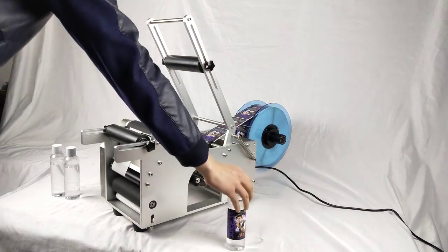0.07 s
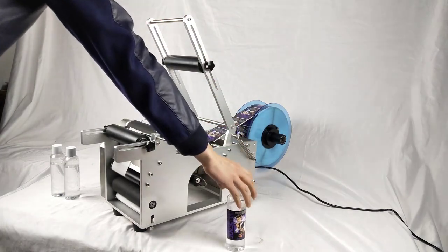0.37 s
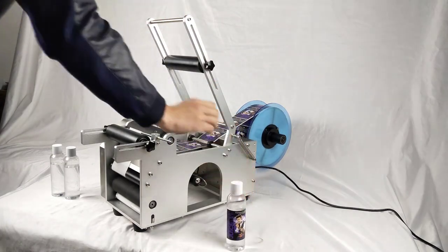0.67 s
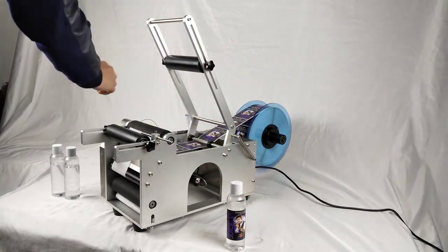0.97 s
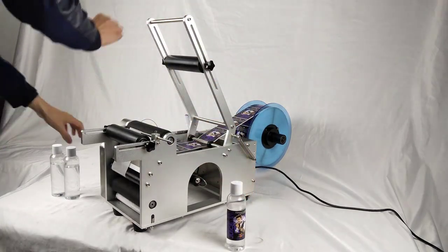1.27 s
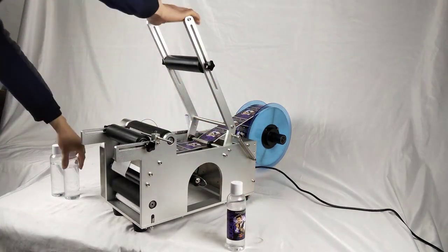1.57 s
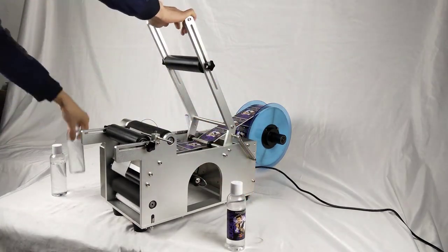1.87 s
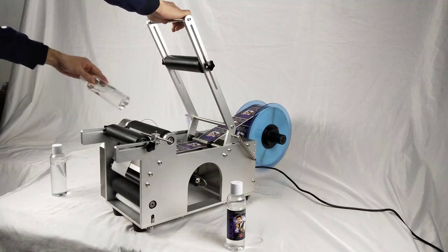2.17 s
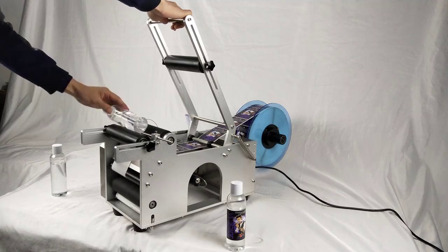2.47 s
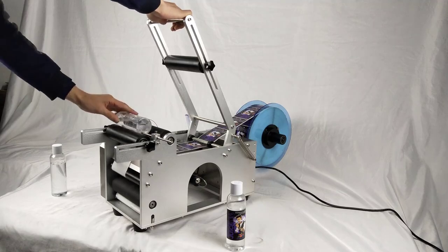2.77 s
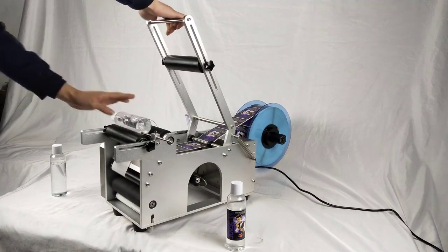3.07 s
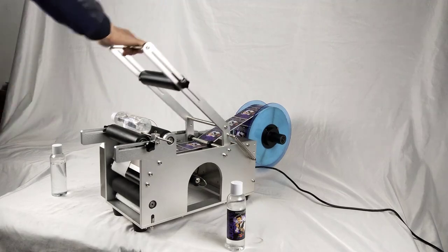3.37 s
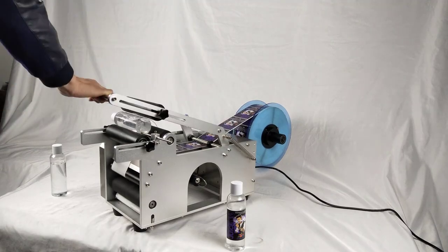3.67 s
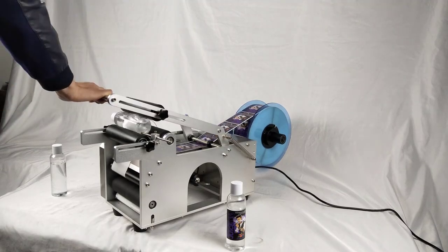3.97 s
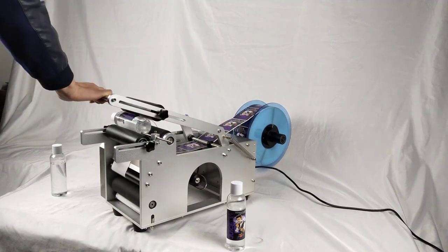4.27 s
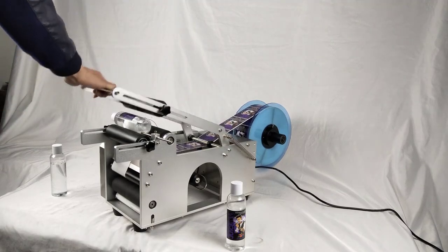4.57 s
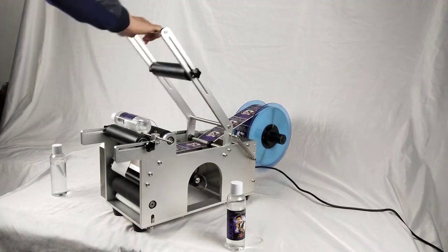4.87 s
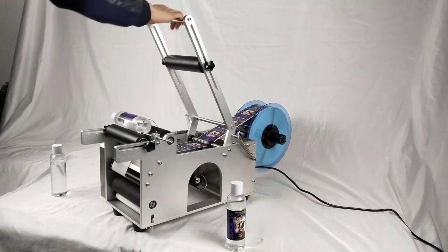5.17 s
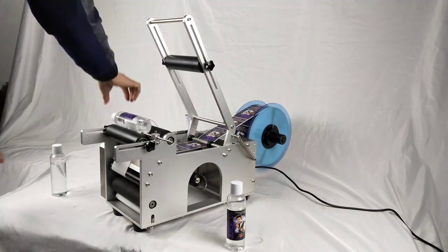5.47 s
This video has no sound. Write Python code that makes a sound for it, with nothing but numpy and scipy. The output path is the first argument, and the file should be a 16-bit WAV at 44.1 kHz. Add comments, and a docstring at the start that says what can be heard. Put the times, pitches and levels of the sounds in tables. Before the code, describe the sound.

A soft, low thud of a bottle on a padded table is followed by quiet swishes of a sleeve. Then a plastic bottle lands on the rollers of a small labeling machine with a sharp clack and a few lighter taps. A metal lever closes with a clunk, starting a brief whining, rattling motor run as a sticky label peels off. A crisp click ends it. Heard in mono from nearby, with short small-room echoes.

```python
"""Hand-fed bottle labeler

In a small room a labeled bottle thuds onto a cloth-covered table and a jacket sleeve rustles.
The next plastic bottle clacks onto the rollers, ringing the steel frame. The lever comes down,
a geared motor whirs for half a second while a label peels off, and the switch clicks free."""
import sys
import numpy as np
from scipy import signal
from scipy.fft import rfft, irfft
from scipy.io import wavfile

SR = 44100
rng = np.random.default_rng(int(sys.argv[2]) if len(sys.argv) > 2 else 0)


def transcribe(signal):
    """Save signal, clipped to [-1, 1], as a 16-bit WAV file at the path in sys.argv[1]."""
    frames = np.atleast_2d(signal).T
    limited = np.clip(frames, -1, 1)
    pcm = np.round(limited * 32767).astype(np.int16)
    wavfile.write(sys.argv[1], SR, pcm)


N = 247401
T = np.arange(N) / SR
SHOT_T, SHOT_HZ = T[:SR], np.fft.rfftfreq(SR, 1 / SR)  # axes of a one-second one-shot


def amp(db):
    return 10 ** (np.asarray(db) / 20)


def unit(x):
    return x / np.sqrt(np.mean(x ** 2) + 1e-20)


def curve(points, hz):
    """Breakpoints joined by lines on a log-frequency axis."""
    f, value = np.transpose(points)
    return np.interp(np.log(hz + 1), np.log(f + 1), value)


def eq_gain(points, resonances, hz):
    """Gain of an EQ curve with bell-shaped resonances on top."""
    bells_db = sum(db / (1 + (2 * (hz - f) / width) ** 2) for f, width, db in resonances)
    return amp(curve(points, hz) + bells_db)


def colour(x, points, resonances=()):
    """Equalises x and brings it to rms 1."""
    hz = np.fft.rfftfreq(len(x), 1 / SR)
    return unit(irfft(rfft(x) * eq_gain(points, resonances, hz), len(x)))


def waver(hz):
    """Random modulation of rms 1, up to about hz."""
    lowpass = np.exp(-(np.fft.rfftfreq(N, 1 / SR) / hz) ** 2)
    return unit(irfft(rfft(rng.standard_normal(N)) * lowpass, N))


def ramp(start, length):
    return np.clip((T - start) / length, 0, 1)


def swell(peak, width):
    return np.exp(-((T - peak) / width) ** 2)


def add(mix, start, sound):
    part = mix[max(round(start * SR), 0):][:len(sound)]
    part += sound[:len(part)]


def ring(modes):
    """One second of damped modes struck together, in alternating polarity."""
    return sum((-1) ** k * amp(db - 60 * SHOT_T / t60) * np.sin(2 * np.pi * hz * SHOT_T)
               for k, (hz, db, t60) in enumerate(modes))


# reverb time of the small room: f/Hz, t60/s
ROOM_DECAY = [(100, 0.54), (400, 0.78), (1000, 0.49), (3000, 0.46), (6500, 0.35), (10000, 0.34),
              (16000, 0.28)]


def reflections(predelay_s=0.0029):
    """Dense room echoes of energy 1, each band dying at its own speed."""
    hz, t, bands = signal.stft(rng.standard_normal(SR), SR, nperseg=256)
    decay = amp(-60 * t / curve(ROOM_DECAY, hz)[:, None])
    tail = signal.istft(bands * decay, SR, nperseg=256)[1][:SR]
    tail *= np.clip(SHOT_T / predelay_s - 1, 0, 1)
    return tail / np.linalg.norm(tail)


# EQ of the room tone: f/Hz, level/dB
AIR_EQ = [(15, -47), (25, -17), (61, 7), (93, -5), (193, -6.5), (274, -4), (368, -13.5), (871, -12),
          (1110, -16), (2850, -24), (5280, -20.5), (5730, -29.5), (7100, -28.5), (8810, -38),
          (15500, -37.5)]


def room_tone(level_db=-67.5):
    """A steady bed of low rumble and faint hiss."""
    return amp(level_db) * colour(rng.standard_normal(N), AIR_EQ)


# EQ of the fabric's dull flap and of its bright swish: f/Hz, level/dB
FLAP_EQ = [(25, -3), (50, 7.5), (85, 13.5), (150, 2.5), (260, 0.5), (450, -2), (1000, -5), (2000, -15),
           (3500, -23), (8000, -41)]
SWISH_EQ = [(500, -11), (1300, -0.5), (2500, 1), (3500, -2.5), (5000, -0.5), (7000, -4), (9000, -19.5),
            (12000, -20), (15300, -16)]
# fader ride of the cloth stirring between strokes: t/s, relative level/dB
CLOTH_STIR = [(0, -64.5), (1.0, -70), (1.7, -73), (2.25, -80.5), (3.1, -78), (4.8, -71), (5.6, -73.5)]
# arms reaching, lifting and pulling back: t/s, length/s, relative level/dB, swish offset/dB
SLEEVE_STROKES = [(0.005, 0.26, -60, -10), (0.343, 0.055, -65.5, -14), (0.437, 0.022, -62, -11),
                  (0.533, 0.2, -62.5, -7.5), (0.795, 0.08, -61, -10.5), (1.057, 0.45, -63, -6),
                  (1.205, 0.26, -68, 2.5), (1.552, 0.052, -65.5, -3.5), (1.749, 0.022, -68.5, -7),
                  (2.014, 0.042, -66, -4.5), (2.082, 0.022, -66, -7), (2.492, 0.458, -66, -8),
                  (3.026, 0.02, -63.5, -7), (3.179, 0.031, -65, -7), (3.246, 0.046, -65, -5),
                  (3.32, 0.033, -64.5, -4.5), (3.383, 0.059, -64.5, -5), (3.557, 0.045, -63.5, -7),
                  (3.626, 0.095, -67.5, -4.5), (4.419, 0.076, -63.5, -3), (4.541, 0.068, -71.5, 1.5),
                  (4.68, 0.037, -65.5, -11), (4.882, 0.18, -72.5, -2.5), (5.114, 0.16, -61.5, -10.5),
                  (5.37, 0.076, -70, -13), (5.515, 0.077, -70, -2.5)]


def sleeve(flap_db=4, swish_db=2, grain_db=2, stir_waver_db=2.5, stir_swish_db=-8,
           rise_s=0.024, fall_s=0.022, arch_db=0.5):
    """Fabric slides over itself: a flap and a swish of fine slips follow the speed of the arm."""
    flap = colour(rng.standard_normal(N), FLAP_EQ)
    swish = colour(rng.standard_normal(N) * amp(grain_db * waver(hz=490)), SWISH_EQ)
    stir = amp(np.interp(T, *np.transpose(CLOTH_STIR)) + stir_waver_db * waver(hz=9))
    flap_power = stir ** 2
    swish_power = (stir * amp(stir_swish_db)) ** 2
    for start, length, db, treble_db in SLEEVE_STROKES:
        arch = np.sin(np.pi * ramp(start, length + fall_s)) - 0.5  # fastest midway
        release = np.exp(-np.maximum(T - start - length, 0) / fall_s)
        speed = amp(db + arch_db * arch) * ramp(start, rise_s) * release
        flap_power += speed ** 2
        swish_power += (speed * amp(treble_db)) ** 2
    return amp(flap_db) * np.sqrt(flap_power) * flap + amp(swish_db) * np.sqrt(swish_power) * swish


# soft touches of hand, cuff and bottle base: t/s, level/dB, EQ at 4 kHz/dB, t60/s
SOFT_TOUCHES = [(0.0122, -48, -14, 0.12), (0.022, -45, -17, 0.13), (0.807, -58, -15, 0.12),
                (5.139, -56.5, -31, 0.11), (5.232, -53.5, -22, 0.11)]


def bumps():
    """Padded contacts ring nothing: each is a dull puff."""
    out = np.zeros(N)
    for start, db, bright_db, t60 in SOFT_TOUCHES:
        puff_eq = [(40, -9), (120, -2), (500, 5.5), (1300, -9), (4000, bright_db), (10000, -37)]
        puff = colour(rng.standard_normal(SR), puff_eq)
        add(out, start, puff * amp(db - 60 * SHOT_T / t60))
    return out


# bottle base meeting the padded table: t/s, level/dB, f/Hz, t60/s
TABLE_THUDS = [(0.0193, -31, 281, 0.055), (0.0244, -31.5, 150.2, 0.15), (0.041, -27, 160, 0.039),
               (0.052, -30, 89, 0.14)]


def table_thuds(attack_s=0.00082):
    """The cloth leaves only a few low, quickly damped swings of the table top."""
    out = np.zeros(N)
    attack = 1 - np.exp(-SHOT_T / attack_s)
    for start, db, hz, t60 in TABLE_THUDS:
        add(out, start, ring([(hz, db, t60)]) * attack)
    return out


# EQ of a bright tick: f/Hz, level/dB
TICK_EQ = [(1500, -11.5), (3200, -6.5), (4800, -8), (6000, -3), (7200, -5), (10500, -16), (13000, -16),
           (14300, -13), (15300, -3)]
# switch and small parts: t/s, level/dB, ring f/Hz, ring width/Hz, ring t60/s, tick offset/dB
PART_CLICKS = [(2.2352, -56, 4100, 1100, 0.033, -18), (4.615, -54, 6630, 501, 0.06, 10),
               (4.650, -45.5, 5000, 380, 0.06, -24), (4.898, -74, 5100, 220, 0.23, -10),
               (4.968, -70.5, 5000, 220, 0.13, -10), (5.04, -69, 5000, 220, .15, -12)]


def clicks(tick_t60=0.13):
    """Small parts tick and leave a cluster of close modes ringing."""
    out = np.zeros(N)
    for start, db, ring_hz, width, t60, tick_db in PART_CLICKS:
        band = 1 / (1 + (2 * (SHOT_HZ - ring_hz) / width) ** 4)
        cluster = unit(irfft(rfft(rng.standard_normal(SR)) * band, SR)) * amp(-60 * SHOT_T / t60)
        tick = colour(rng.standard_normal(SR), TICK_EQ) * amp(tick_db - 60 * SHOT_T / tick_t60)
        add(out, start, amp(db) * (cluster + tick))
    return out


# modes that ring with each hit, those of the steel frame and rollers plus the long bottle rings near 1.7 and
# 3.4 kHz: f/Hz, relative level/dB, t60/s
FRAME_MODES = [(86.3, -8.5, 0.54), (149.8, -12, 0.79), (163, -14, 0.7), (297.6, -11, 0.76), (350, -10.5, 1),
               (402.4, -16.5, 1), (440, -15, 0.2), (562, -14, 0.99), (561, -9, 0.39), (700, -30, 0.4),
               (798, -20, 0.8), (959, -9.5, 0.18), (1108, -10, 0.14), (1066, -11, 0.16), (1390, -15, 0.17),
               (1516, -9, 0.23), (1705, -11.5, 0.42), (2165, -12, 0.15), (3090, -28, 0.19),
               (3400, -9.5, 0.42), (4300, -17, 0.15)]


def knocks(hits, eq, resonances, wet_db):
    """Each hit is a dense clatter, its echoes and the frame's ring, coloured by contact hardness."""
    out = np.zeros(N)
    body = unit(eq_gain(eq, resonances, SHOT_HZ))
    fade_out = np.minimum(2 - 2 * SHOT_T, 1) ** 2
    for start, db, bass_db, treble_db, fizz_db, t60, ring_db in hits:
        contact = [(300, bass_db), (1100, 0.0041), (5500, treble_db), (12000, fizz_db)]
        rattle = rng.standard_normal(SR) * amp(-60 * SHOT_T / t60)
        echoes = amp(wet_db) * np.linalg.norm(rattle) * reflections()
        clatter = irfft(rfft(rattle + echoes) * body * amp(curve(contact, SHOT_HZ)), SR)
        frame = ring([(f, level + curve(contact, f), decay) for f, level, decay in FRAME_MODES])
        add(out, start, amp(db) * (clatter + amp(ring_db) * frame) * fade_out)
    return out


# EQ of the bottle's clack: f/Hz, level/dB
BOTTLE_EQ = [(40, -22), (90, -3), (210, -6), (480, 1), (700, -5.5), (1030, 0.5), (1600, -3), (2000, -8),
             (2400, -7), (3000, -10), (5500, -10.5), (7000, -10), (9000, -22), (11500, -30.5), (16000, -32)]
# resonances of its shell against the rollers: f/Hz, width/Hz, gain/dB
SHELL_PEAKS = [(1110, 59, 4), (1370, 50, 3), (1510, 55, 3.5), (1692, 57, 8.5), (2330, 68, 4), (2870, 83, 6),
               (3400, 180, 9.5), (4260, 110, 6.5), (4760, 150, 8), (5140, 110, 5), (5270, 59, 6),
               (6130, 140, 7), (6880, 80, 7), (7730, 60, 6)]
# bottle hits: t/s, level/dB, bass/dB, treble/dB, fizz/dB, clatter t60/s, frame ring/dB
BOTTLE_HITS = [(2.4251, -34, -12, 4.5, 4, 0.079, -6.5), (2.4293, -24.5, -2.5, -3, -9, 0.041, -11),
               (2.4435, -44, 2, 7, -17, 0.15, -25), (2.477, -47, 11.5, 0, -5, 0.022, -7.5),
               (2.656, -48.5, 8.5, -2.5, -10, 0.1, -8), (2.670, -51, 12.5, 3, -4, .04, -6),
               (2.700, -53, 7, -1, 2, .025, -2), (2.7175, -41.5, 7, 0, -10, 0.063, -12.5),
               (3.044, -62, 12, -7, -9, 0.067, -31), (3.1765, -50.5, 3.5, 6, 2.5, 0.075, -26)]


def bottle():
    """The plastic bottle lands on the rollers and settles."""
    return knocks(BOTTLE_HITS, BOTTLE_EQ, SHELL_PEAKS, wet_db=-3)


# EQ of the lever's clunk: f/Hz, level/dB
LEVER_EQ = [(40, -5), (90, 0.5), (210, -9), (400, -6.5), (520, -2.5), (680, 3.5), (880, -2.5), (1160, 4.5),
            (1900, -4.5), (4600, -6), (7200, -6.5), (9500, -25), (16000, -27)]
# lever hits: t/s, level/dB, bass/dB, treble/dB, fizz/dB, clatter t60/s, frame ring/dB
LEVER_HITS = [(3.680, -61, 12, 2, -4, 0.13, -25), (3.7178, -33, -2, 6.5, 2.5, 0.044, -14.5),
              (3.7222, -31.5, 0, -11, 1, 0.061, -18.5), (3.746, -31.5, 4, -28, -14, 0.078, -20),
              (4.6495, -52, 6.5, 8.5, 1, 0.076, -12)]


def lever():
    """The pressure lever closes, presses home and lifts."""
    return knocks(LEVER_HITS, LEVER_EQ, [], wet_db=-2)


def running(start, rise, t60, motor_off_s=4.266):
    """Fades in, holds while the motor is on, then dies away."""
    return ramp(start, rise) * amp(-60 * np.maximum(T - motor_off_s, 0) / t60)


def tooth_pulse(shaft_hz=79, jitter=0.004, depth=0.13):
    """Meshing teeth make a fast tremolo in step with the shaft."""
    angle = 2 * np.pi * np.cumsum(shaft_hz * (1 + jitter * waver(hz=8.6))) / SR
    return 1 + depth * sum(np.cos(k * angle) for k in (1, 3, 6)) / 2


# resonances of gearbox and side plates, shared by peel and gears: f/Hz, width/Hz, gain/dB
HOUSING_PEAKS = [(460, 33, 5), (528, 35, 3), (1195, 50, 5), (1760, 56, -3), (2305, 49, 3), (2910, 130, -1),
                 (3500, 130, 1), (3900, 65, 4), (4350, 50, 3.5), (4760, 69, 5.5), (6200, 55, -1),
                 (6680, 200, 5), (7260, 45, 5)]
# EQ of the glue's crackle: f/Hz, level/dB
PEEL_EQ = [(900, -8.5), (2500, -15.5), (4200, -13), (5200, -2.5), (6000, -2), (6650, -0.5), (7400, -2.5),
           (8000, -9), (9800, -18.5), (12500, -20), (15300, -16)]


def label_peel(teeth, wrap, tug, level_db=-42, ease_db=2, tug_db=5, grain_db=1.3):
    """Glue crackles off the liner, eases as the label wraps and comes free with a last tug."""
    crackle = rng.standard_normal(N) * teeth * amp(grain_db * waver(hz=1500))
    level = running(start=3.755, rise=0.12, t60=0.31) * amp(level_db - ease_db * wrap + tug_db * tug)
    return level * colour(crackle, PEEL_EQ, HOUSING_PEAKS)


def motor_whine(angle, tug, hum_db=-42.5, octave_db=-43, octave_start_s=3.945, growth_db_per_s=14,
                dip_db=3, tug_db=3, flutter_db=1.6):
    """The octave grows as the bottle rolls; mid-wrap it dips while the fundamental swells once."""
    hum = swell(peak=4.1, width=0.065)
    ride_db = growth_db_per_s * (T - octave_start_s) - dip_db * hum + tug_db * tug
    octave = running(octave_start_s, rise=0.029, t60=0.14) * amp(octave_db + ride_db)
    tone = amp(hum_db) * hum * np.sin(angle) + octave * np.sin(2 * angle)
    return np.sqrt(2) * tone * amp(flutter_db * waver(hz=25))


# EQ of the gear rattle: f/Hz, level/dB
GEAR_EQ = [(40, -15), (90, 6), (200, -19), (330, -2), (520, 4.5), (950, -3), (1350, 1), (2000, -0.5),
           (2900, -1.5), (3600, 1), (5000, -3), (7000, -11), (9000, -19.5), (15500, -21)]
# motor overtones: harmonic number, level against the rattle/dB
MOTOR_OVERTONES = [(4, -15), (8, -24), (10, -17), (11, -20), (12, -13), (14, -17), (19, -16)]


def gears(teeth, angle, wrap, idle_db=-52.5, loaded_db=-42, grain_db=2, flutter_db=3):
    """Gear teeth rattle under the motor's overtones, louder as the wrapping label loads them."""
    load = running(start=3.711, rise=0.008, t60=0.28) * amp(idle_db + (loaded_db - idle_db) * wrap)
    rattle = rng.standard_normal(N) * teeth * amp(grain_db * waver(hz=780))
    overtones = sum(amp(db + flutter_db * waver(hz=12)) * np.sin(round(k) * angle)
                    for k, db in MOTOR_OVERTONES)
    return load * (colour(rattle, GEAR_EQ, HOUSING_PEAKS) + overtones)


def drive(free_hz=352.3, loaded_hz=347, jitter=0.004):
    """The motor winds the label on, its pitch sagging under load. Returns whir and whine stems."""
    wrap = ramp(start=3.83, length=0.26)
    tug = swell(peak=4.252, width=0.053)
    teeth = tooth_pulse()
    pitch_hz = (free_hz + (loaded_hz - free_hz) * wrap) * (1 + jitter * waver(hz=28.7))
    angle = 2 * np.pi * np.cumsum(pitch_hz) / SR
    whir = label_peel(teeth, wrap, tug) + gears(teeth, angle, wrap)
    return whir, motor_whine(angle, tug)


def scene(click_wet_db=-5, whir_wet_db=-6, whine_wet_db=-13, thud_wet_db=-14):
    """A mono mix in one room; bottle and lever bring their own echoes and skip the reverb send."""
    hits = bottle() + lever()
    ticks, thuds = clicks(), table_thuds()
    whir, whine = drive()
    send = (amp(thud_wet_db) * thuds + amp(click_wet_db) * ticks
            + amp(whir_wet_db) * whir + amp(whine_wet_db) * whine)
    reverb = signal.fftconvolve(send, reflections())[:N]
    mono = room_tone() + reverb + sleeve() + bumps() + thuds + ticks + hits + whir + whine
    return np.array([mono, mono])


def record(dry, low_cut_hz=50, high_cut_hz=15600):
    """A low cut and a steep high cut on the master."""
    low_cut = signal.butter(3, low_cut_hz, "highpass", fs=SR, output="sos")
    high_cut = signal.firwin(511, high_cut_hz, window=("kaiser", 9), fs=SR)
    return signal.oaconvolve(signal.sosfilt(low_cut, dry), high_cut[None], "same")


dry = scene()
out = record(dry)
transcribe(out)
```